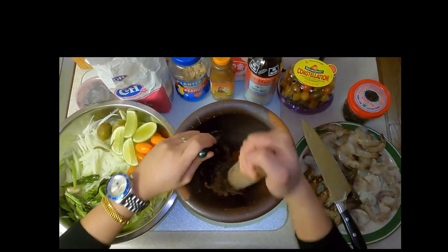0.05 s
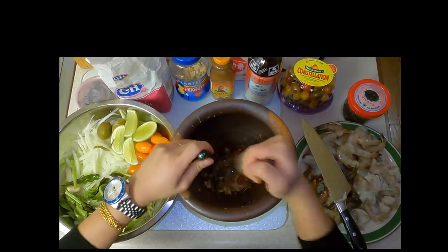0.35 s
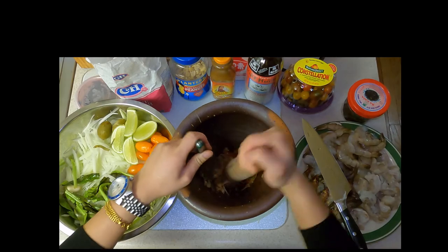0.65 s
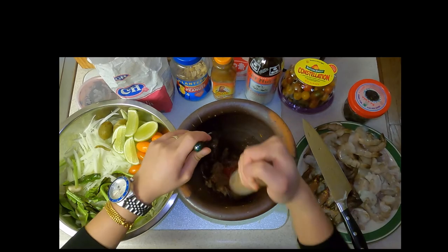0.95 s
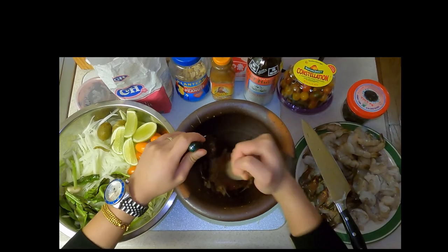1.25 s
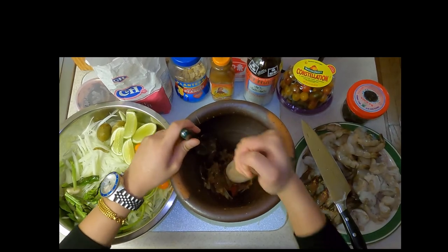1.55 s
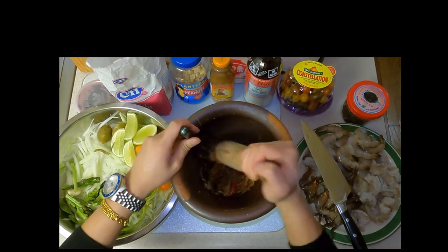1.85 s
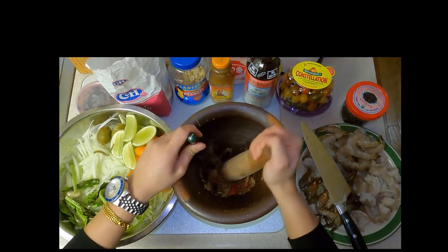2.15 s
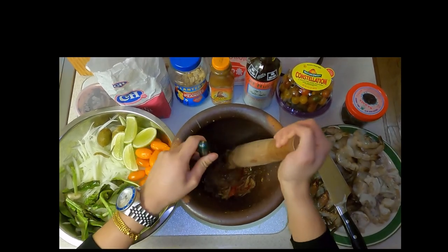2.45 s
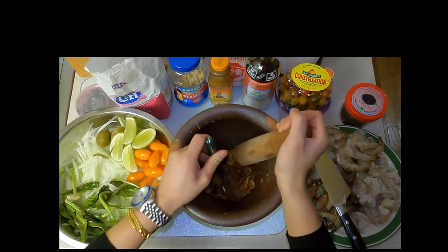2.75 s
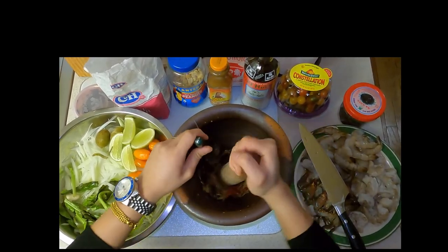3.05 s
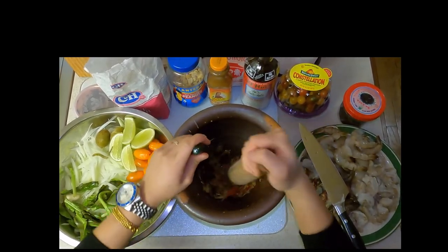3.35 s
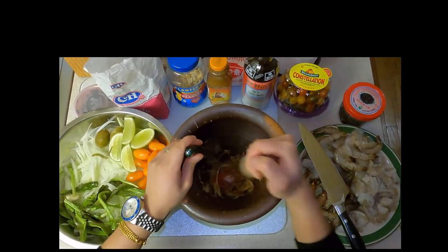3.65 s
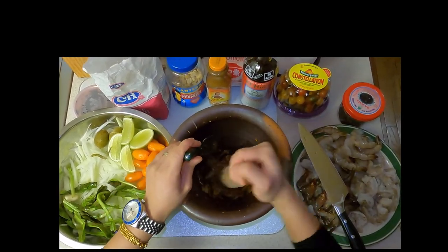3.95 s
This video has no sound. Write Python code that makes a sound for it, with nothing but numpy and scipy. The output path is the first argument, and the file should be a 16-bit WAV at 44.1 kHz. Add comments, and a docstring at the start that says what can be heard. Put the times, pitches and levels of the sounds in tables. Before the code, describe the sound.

Close up in a small kitchen, a pestle pounds in a clay mortar with quick, woody thuds, wet squishes and small cracks. The blows give way to a few taps and faint scraping on the wall before resuming.

```python
"""Clacking, thumping blows of a wooden pestle, close up, pounding wet food in a clay mortar.
Each blow rings the bowl and thumps the kitchen table under it; then the paste squelches as the
pestle sinks in, pieces burst and air pockets pop. Between blows the pestle scrapes the wall, and in
a pause it taps the bare clay. A small room answers, over faint air and the table's low rocking."""
import sys
import numpy as np
from scipy import signal
from scipy.fft import rfft, irfft, next_fast_len
from scipy.io import wavfile

SR = 44100
rng = np.random.default_rng(int(sys.argv[2]) if len(sys.argv) > 2 else 0)


def pcm_store(signal):
    """Save signal as 16-bit PCM."""
    levels = np.round(np.clip(np.atleast_2d(signal), -1, 1) * 32767)
    wavfile.write(sys.argv[1], SR, levels.astype(np.int16).T)


N = 176400
T = np.arange(SR * 3 // 4) / SR  # seconds within one sound
HZ = np.fft.rfftfreq(2 * len(T), 1 / SR)  # frequency grid of the EQ curves

# Pestle blows. Each row: start in seconds, levels in dB of table thump, dull knock (played 4 dB up),
# bowl ring, wooden clack and hard click, clack pitch in Hz, ring length as a factor.
BLOWS = [(0.04, -15, -25.5, -53, -26, -29, 1940, .5), (0.2341, -15, -22.5, -23.5, -10, -25, 1344, 1.5),
         (0.4344, -26, -34.5, -20, -17.5, -44, 1640, 0.4), (.678, -33, -24, -19, -25.5, -28, 1380, 0.37),
         (0.8947, -25.5, -23.5, -22, -24, -27, 1700, 0.71), (1.102, -23, -25, -19, -18, -27.5, 1325, 0.39),
         (1.3177, -21, -25.5, -20, -31.5, -37, 1050, .55), (1.568, -17, -20, -27, -17.5, -31, 1200, 0.61),
         (1.782, -15.5, -18.5, -21, -11, -23, 1340, 0.81), (3.157, -13.5, -16.5, -46, -10, -29.5, 1248, .8),
         (3.354, -22, -21, -22, -16, -34.5, 1230, 0.83),
         (3.7635, -35, -32.5, -28, -27.5, -41.5, 1626, 0.42)]
# Tone of the clack, the knock and the click. Each row: frequency in Hz, gain in dB.
CLACK_EQ = [(200, -27.5), (700, -23.5), (950, -6), (1550, -3), (1780, 1.5), (2050, -5), (2400, -50.5),
            (3400, -19), (4200, -75.5), (15000, -107)]
KNOCK_EQ = [(60, -8.5), (160, -1), (260, -3.5), (600, -7), (1100, -25), (2500, -29.5), (8000, -55)]
CLICK_EQ = [(200, -15.5), (1500, -24), (2000, 8.5), (2450, -10), (2950, 3.5), (4200, -9), (5000, -2),
            (5800, -11.5), (8500, -16.5), (16000, -45.5)]
# The table's boom. Each row: mode frequency in Hz, relative level in dB, t60 in seconds.
TABLE_MODES = [(32.4, -11, 0.77), (65.7, -0.5, 0.3), (88.1, -2.5, 0.25), (133.4, 2.5, 0.16),
               (181, -7.5, .14), (249.3, -10.5, 0.12), (303.2, -7, 0.12)]
def pounding():
    """Wood strikes clay through the food; the bowl rings, and the table thumps just after."""
    out = np.zeros((2, N))
    thump_lag_s = 0.0037
    for start, thump_db, knock_db, ring_db, clack_db, click_db, hz, ring_length in BLOWS:
        clack_eq = curve(CLACK_EQ, HZ) + peak(hz, width_hz=38, db=8.5)
        clack = amp(clack_db) * burst(clack_eq, attack=0.0017, t60=0.015)
        knock = amp(knock_db + 4) * burst(curve(KNOCK_EQ, HZ), attack=0.0012, t60=0.147)
        click = amp(click_db) * burst(curve(CLICK_EQ, HZ), attack=0.00085, t60=0.027)
        bowl = amp(ring_db) * ring(bottom_modes(ring_length), attack=0.00087, scatter_db=1.9)
        add_in_room(out, start, clack + knock + hollow(click, wall_db=-4.5) + bowl, room_db=-8)
        thump = amp(thump_db) * ring(TABLE_MODES, attack=0.0018)
        add_in_room(out, start + thump_lag_s, thump, room_db=-12.5)
    return out


# The clay bowl's ring. Each row: mode frequency in Hz, relative level in dB when struck at the
# bottom, the same when struck on the wall, base t60 in seconds.
BOWL_MODES = [(523, -6, -15, 0.24), (728, -17, -18.5, 0.19), (971, -7.5, -16, 0.24), (1031, -2.5, -8, 0.31),
              (1055.6, -7.5, -12.5, 0.16), (1228, -3.5, 4, 0.066), (1355, -23.5, -3, 0.083),
              (1756, -15, -9, 0.072), (1997, -16.5, -11, 0.14), (2470, -47, -0.5, 0.033),
              (2933, -44, 3, 0.036), (3630, -20, -6, 0.13), (4360, -36, -5.5, 0.059),
              (5100, -28.5, -13, 0.2), (5320, -33, -18, .045)]
def bottom_modes(ring_length):
    """The bowl struck through the food, whose damping sets how long it rings."""
    return [(hz, db, t60 * ring_length) for hz, db, _, t60 in BOWL_MODES]


def wall_modes():
    """The bowl struck or rubbed on its wall, where it sounds brighter."""
    return [(hz, db, t60) for hz, _, db, t60 in BOWL_MODES]


# Squelches. Each row: peak time in seconds, level in dB (played 3.5 dB up), rise and fall in seconds,
# level of the push on the table in dB.
SQUELCHES = [(0.044, -41, 0.054, 0.34, -48), (.362, -38.5, 0.11, 0.083, -45),
             (0.499, -33, 0.056, 0.15, -20.5), (0.745, -35.5, 0.15, 0.071, -25),
             (0.941, -29.5, 0.053, 0.11, -16.5), (1.164, -31.5, 0.082, 0.11, -19.5),
             (1.383, -31.5, 0.1, 0.095, -22.5), (1.6, -38, 0.049, 0.13, -19), (1.848, -41.5, .1, 0.12, -39),
             (2.016, -35.5, 0.05, 0.099, -28.5), (2.232, -32, 0.037, 0.054, -24),
             (3.21, -55.5, 0.11, 0.15, -19), (3.385, -42.5, 0.028, 0.24, -23.5),
             (3.602, -40, 0.076, 0.14, -35), (3.831, -35.5, 0.098, 0.043, -28.5),
             (3.876, -42.5, 0.021, 0.16, -43)]
# Tone of the wet paste. Each row: frequency in Hz, gain in dB.
PASTE_EQ = [(80, -6), (200, -6.5), (750, -5), (1650, 0.5), (2250, -5.5), (2960, -3), (5040, -9),
            (9750, -21), (16000, -41.5)]
def mashing():
    """Wet paste crackles under the pestle, which bottoms out and nudges the table."""
    out = np.zeros((2, N))
    for peak_s, db, rise, fall, push_db in SQUELCHES:
        crackle = grains(PASTE_EQ, rise, fall, ticks_per_s=1300, clump_db=4.5, hiss=0.18)
        squelch = amp(db + 3.5) * hollow(crackle, wall_db=-1)
        add_in_room(out, peak_s - rise, squelch, room_db=-14.5)
        push = amp(push_db) * ring(TABLE_MODES, attack=0.0066)
        add_in_room(out, peak_s - 0.008, push, room_db=-24)
    return out


# Crisp snaps. Each row: start in seconds, level in dB, centre frequency in Hz.
SNAPS = [(0.0356, -19.5, 3020), (0.48, -40, 3800), (0.7354, -26.5, 3930), (1.145, -35, 3820),
         (1.993, -36.5, 3700), (2.2422, -36, 3420), (3.38, -27, 3950), (3.603, -30.5, 3430),
         (3.795, -35.5, 3900), (3.871, -26.5, 3340)]
def snapping():
    """Pieces of food burst, each a short bright crack inside the bowl."""
    out = np.zeros((2, N))
    for start, db, hz in SNAPS:
        octaves_off = np.log2((HZ + 1) / hz)
        band_eq = np.maximum(-13 * octaves_off ** 2, -50)
        crack = burst(band_eq, attack=0.0004, t60=0.017)
        add_in_room(out, start, amp(db) * hollow(crack, wall_db=-4), room_db=-13)
    return out


# Wet pops. Each row: start in seconds, level in dB, pitch in Hz.
POPS = [(1.424, -20.5, 1810), (3.839, -26, 1930), (3.871, -30, 1640)]
def popping():
    """Air pockets in the paste pop under the pestle, each with one resonance."""
    out = np.zeros((2, N))
    for start, db, hz in POPS:
        pocket_eq = curve(PASTE_EQ, HZ) + peak(hz, width_hz=270, db=17.5)
        add_in_room(out, start, amp(db) * burst(pocket_eq, attack=0.005, t60=0.037), room_db=-13.5)
    return out


# Slides along the clay. Each row: peak time in seconds, level in dB, rise and fall in seconds.
SCRAPES = [(.005, -31.5, 0.028, 0.052), (0.194, -38, 0.17, 0.4), (0.599, -40.5, 0.1, 0.074),
           (0.676, -37.5, 0.1, 0.16), (1.091, -51, 0.11, 0.28), (2.108, -49, 0.059, 0.11),
           (2.489, -51.5, 0.16, 0.052), (2.681, -55, .01, 0.13), (2.797, -48, 0.041, 0.069),
           (2.852, -44.5, .03, 0.048), (3.317, -50, 0.076, 0.078)]
# Tone of the grit. Each row: frequency in Hz, gain in dB.
GRIT_EQ = [(200, -3), (1000, -2), (2600, -2), (4300, -7.5), (5400, -0.5), (8400, -8), (10500, -22),
           (12500, -18), (16000, -51)]
def scraping():
    """Fine gritty friction of wood on unglazed clay makes the bowl's upper modes sing."""
    out = np.zeros((2, N))
    upper_modes = [(hz, db, t60) for hz, db, t60 in wall_modes() if hz > 2000]
    for peak_s, db, rise, fall in SCRAPES:
        friction = grains(GRIT_EQ, rise, fall, ticks_per_s=3300, clump_db=7.5, hiss=0.35)
        grit = hollow(friction, wall_db=1.5)
        singing = convolved(grit, ring(upper_modes, attack=0.0005))
        singing = amp(-3.5) * with_energy(singing, np.sum(grit[0] ** 2) / SR)
        add_in_room(out, peak_s - rise, amp(db) * (grit + singing), room_db=-17)
    return out


# Taps on bare clay. Each row: start in seconds, levels in dB of wooden tock, bowl ring and hard click,
# pitch of the struck spot in Hz.
TAPS = [(2.397, -13, -31, -42, 1854), (2.5132, -35, -41, -32, 1974), (2.7414, -19.5, -35.5, -37.5, 1240),
        (2.867, -22.5, -21.5, -17.5, 1975)]
# Tone of the tock. Each row: frequency in Hz, gain in dB.
TOCK_EQ = [(150, -22), (950, -17.5), (1220, -1), (1400, -12.5), (1700, 3.5), (2150, -8.5), (2550, -2.5),
           (3200, -13.5), (12000, -59)]
def tapping():
    """The pestle knocks the upper wall, with no weight on the table; harder contacts ring brighter."""
    out = np.zeros((2, N))
    for start, tock_db, ring_db, click_db, spot_hz in TAPS:
        spot_eq = peak(spot_hz, width_hz=37, db=8.5)
        tock = amp(tock_db) * burst(curve(TOCK_EQ, HZ) + spot_eq, attack=0.00013, t60=0.013)
        click = amp(click_db) * burst(curve(CLICK_EQ, HZ) + spot_eq, attack=0.00014, t60=0.038)
        tilt_db_per_octave = 0.13 * (click_db - tock_db)
        modes = [(hz, db + tilt_db_per_octave * np.log2(hz), t60) for hz, db, t60 in wall_modes()]
        bowl = amp(ring_db) * ring(modes, attack=0.0013)
        add_in_room(out, start, tock + click + bowl, room_db=-9.5)
    return out


def hollow(x, wall_db, t60=0.024):
    """Quick reflections inside the bowl, a little different for every contact."""
    reflections = rng.standard_normal(len(T)) * amp(-60 * T / t60)
    echo = amp(wall_db) * with_energy(reflections, 1 / SR)
    echo[0] = 1  # the direct sound
    return convolved(x, with_energy(echo, 1 / SR))


# The kitchen's short reverb. Each row: frequency in Hz, t60 in seconds.
ROOM_DECAY = [(100, 0.33), (1300, 0.32), (3500, 0.21), (16000, 0.24)]
def add_in_room(out, start, x, room_db):
    """Mix a sound in at start seconds, with its own answer from the kitchen walls."""
    hz, t, noise = signal.stft(rng.standard_normal((2, SR // 2)), SR, nperseg=256)
    decay = amp(-60 * t / curve(ROOM_DECAY, hz)[:, None])
    onset = 1 - np.exp(-t / 0.0014)
    tail = signal.istft(noise * decay * onset, SR, nperseg=256)[1]
    wet = x + amp(room_db) * convolved(x, spread(with_energy(tail, 1 / SR)))
    i = round(start * SR)
    wet = wet[:, max(-i, 0):N - i]
    out[:, max(i, 0):][:, :wet.shape[1]] += wet


# Tone of the table's rumble. Each row: frequency in Hz, gain in dB.
ROCKING_EQ = [(20, -23), (48, -10), (250, -52.5), (2000, -100)]
# Its fader, dipping in the pause. Each row: time in seconds, gain in dB.
ROCKING_FADER = [(1.899, -13), (2.35, -13), (2.52, -27), (3.05, -37), (3.199, -9)]
def table_rocking():
    """The table rocks with a low rumble while the work goes on."""
    fader_db = np.interp(np.arange(N) / SR, *np.transpose(ROCKING_FADER))
    return amp(-35.5 + fader_db) * noise_bed(ROCKING_EQ)


# Room tone. Each row: frequency in Hz, gain in dB.
AIR_EQ = [(25, -5.5), (110, -7), (190, 1.5), (520, -8.5), (700, -16.5), (1500, -13.5), (2500, -24),
          (16000, -49.5)]
def room_air():
    """The faint, steady hush of the kitchen."""
    return amp(-54) * noise_bed(AIR_EQ)


def burst(eq_db, attack, t60):
    """A contact: a dense cluster of quickly dying vibrations, coloured by an EQ curve."""
    envelope = (1 - np.exp(-T / attack)) * amp(-60 * T / t60)
    noise = rng.standard_normal(len(T))
    for _ in range(3):  # even out the spectrum under the envelope
        phase = np.angle(rfft(noise * envelope, 2 * len(T)))
        flat = irfft(np.exp(1j * phase))[:len(T)]
        noise = flat / np.maximum(envelope, envelope.max() / 20)
    return with_energy(equalised(noise * envelope, eq_db), 0.004)


def ring(modes, attack, scatter_db=1.5):
    """Decaying modes (Hz, dB, t60 s), excited a little differently by each contact."""
    hz, db, t60 = np.transpose(modes)[:, :, None]
    gain = amp(db + scatter_db * rng.standard_normal(hz.shape))
    waves = np.sin(2 * np.pi * (hz * T + rng.random(hz.shape))) * amp(-60 * T / t60)
    onset = 1 - np.exp(-T / attack)
    return np.sqrt(2) * (gain * waves).sum(0) / np.linalg.norm(gain) * onset


def grains(eq, rise, fall, ticks_per_s, clump_db, hiss, clumps_per_s=220):
    """Clumps of tiny ticks over fine hiss, swelling 30 dB over rise and fading 30 dB over fall."""
    size = (2, len(T))
    clump_sizes = np.clip(rng.standard_normal(clumps_per_s), -2, 2)
    clumps = np.interp(T * clumps_per_s, np.arange(clumps_per_s), clump_sizes)
    triggers = rng.random(size) < ticks_per_s / SR
    ticks = triggers * rng.standard_normal(size) * amp(clump_db * clumps)
    texture = ticks / ticks.std() + hiss * rng.standard_normal(size)
    envelope = amp(-30 * np.maximum((rise - T) / rise, (T - rise) / fall))
    swell = spread(equalised(texture * envelope, curve(eq, HZ)))
    return with_energy(swell, np.sum(envelope ** 2) / SR)


def noise_bed(eq):
    """Steady diffuse noise of rms 1."""
    noise = spread(filtered(rng.standard_normal((2, N)), lambda hz: amp(curve(eq, hz))))
    return noise / noise.std()


# Stereo image, wider in the treble. Each row: frequency in Hz, left-right correlation.
STEREO_LIKENESS = [(2000, 0.98), (4000, 0.69), (11000, 0.3)]
def spread(pair):
    """Two unrelated signals become a diffuse stereo field."""
    angle = lambda hz: np.arccos(curve(STEREO_LIKENESS, hz)) / 2
    mid, side = filtered(pair, lambda hz: np.array([np.cos(angle(hz)), np.sin(angle(hz))]))
    return np.array([mid + side, mid - side])


def amp(db):
    """Decibels to amplitude."""
    return 10 ** (np.asarray(db) / 20)


def curve(points, hz):
    """Join (Hz, value) points on a log frequency axis."""
    point_hz, values = np.transpose(points)
    return np.interp(np.log(hz + 1), np.log(point_hz + 1), values)


def peak(hz, width_hz, db):
    """A resonance, in dB on the HZ grid."""
    return db / (1 + ((HZ - hz) / width_hz) ** 2)


def with_energy(x, seconds):
    """Scale x to the energy of rms 1 held for so many seconds."""
    return x * np.sqrt(seconds * SR / (np.mean(np.sum(x ** 2, -1)) + 1e-20))


def convolved(x, impulse):
    """Play x through an impulse response, cut to the length of one sound."""
    return signal.fftconvolve(np.atleast_2d(x), np.atleast_2d(impulse), axes=1)[:, :len(T)]


def filtered(x, response):
    """Multiply the spectrum of x by a function of frequency."""
    n = x.shape[-1]
    padded = next_fast_len(n + 8192)
    return irfft(rfft(x, padded) * response(np.fft.rfftfreq(padded, 1 / SR)), padded)[..., :n]


def equalised(x, eq_db):
    """Minimum-phase EQ on the HZ grid: nothing rings ahead of the attack."""
    cepstrum = irfft(np.log(amp(eq_db)))
    cepstrum[1:len(T)] *= 2
    cepstrum[len(T) + 1:] = 0
    return irfft(rfft(x, len(cepstrum)) * np.exp(rfft(cepstrum)))[..., :len(T)]


# The mortar's pan. Each row: frequency in Hz, left minus right in dB.
BALANCE = [(350, 0), (740, 1.7), (1200, 3.5), (2000, 3), (2900, -3.5), (5500, -3.5), (8500, 3), (13000, -1)]
# Its phase offset. Each row: frequency in Hz, lead of the left side in radians.
PHASE_LEAD = [(350, 0), (1000, -.4), (2000, -1.2), (3700, -1.3), (5200, 0), (10000, -.4), (13000, -2)]
def microphone_ports(hz):
    """The mortar reaches the two microphone ports with slightly different level and phase."""
    left_over_right = amp(curve(BALANCE, hz)) * np.exp(1j * curve(PHASE_LEAD, hz))
    return left_over_right ** np.array([[0.5], [-0.5]])


def scene():
    """The mortar up close, over room air and the rocking table."""
    mortar = pounding() + mashing() + snapping() + popping() + scraping() + tapping()
    return filtered(mortar, microphone_ports) + room_air() + table_rocking()


def record(dry, top_hz=15900):
    """A brick-wall low-pass takes off the very top of the treble."""
    return filtered(dry, lambda hz: hz < top_hz)


dry = scene()
out = record(dry)
pcm_store(out)
```